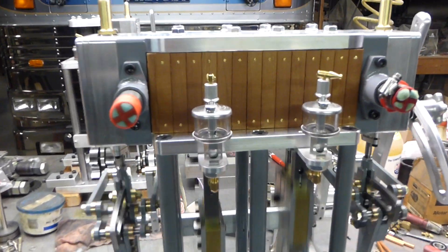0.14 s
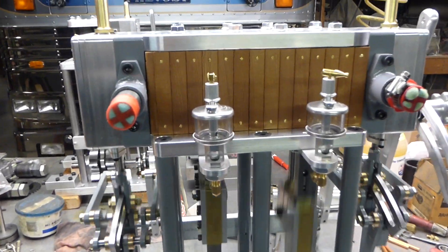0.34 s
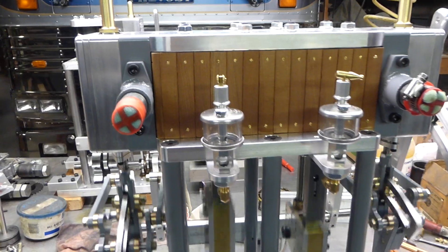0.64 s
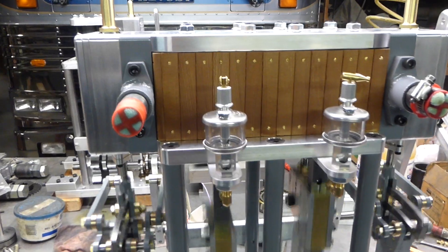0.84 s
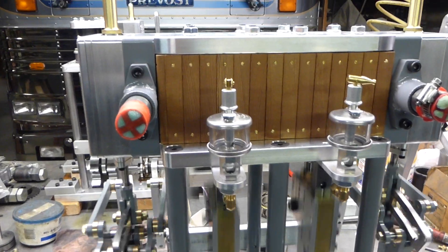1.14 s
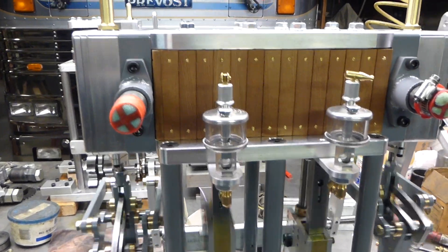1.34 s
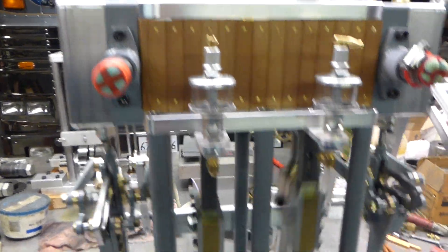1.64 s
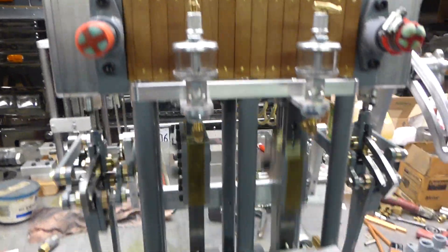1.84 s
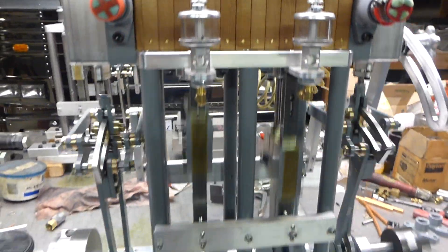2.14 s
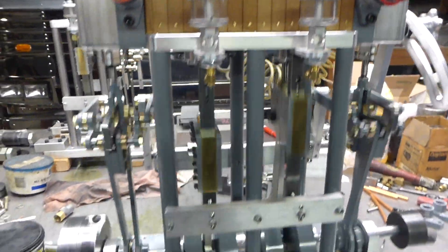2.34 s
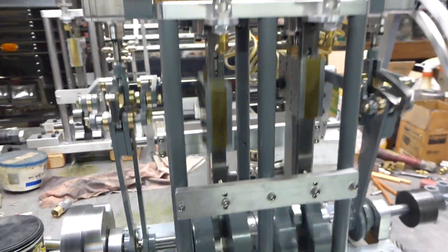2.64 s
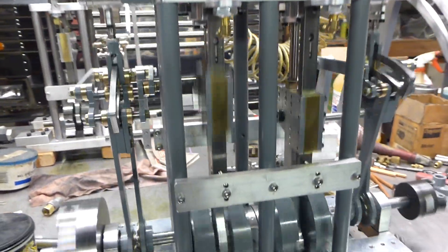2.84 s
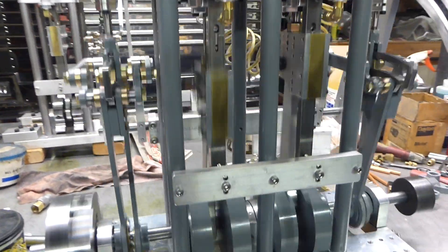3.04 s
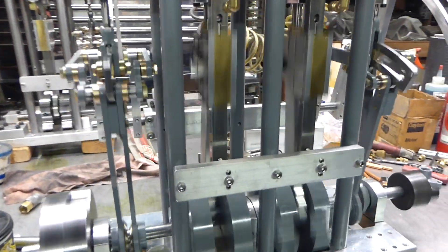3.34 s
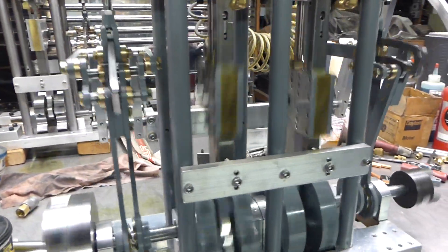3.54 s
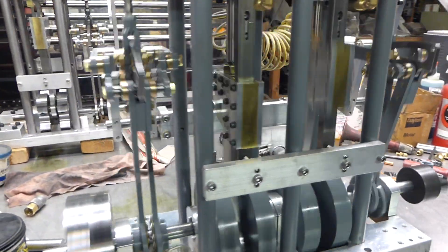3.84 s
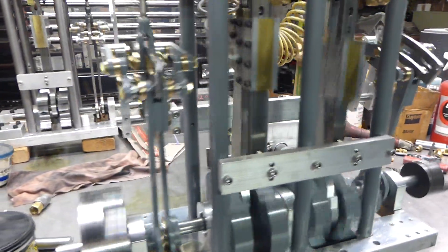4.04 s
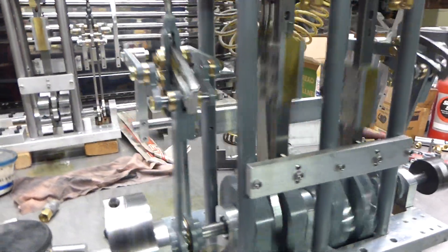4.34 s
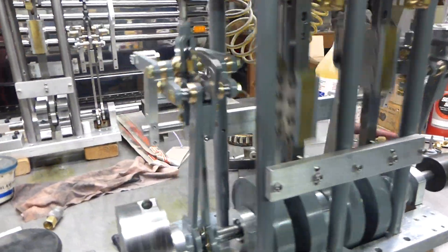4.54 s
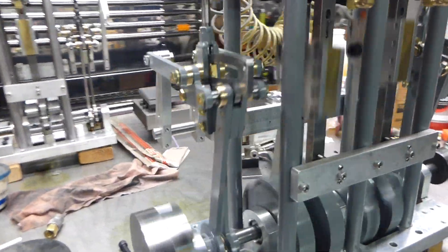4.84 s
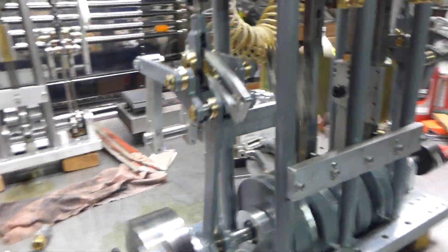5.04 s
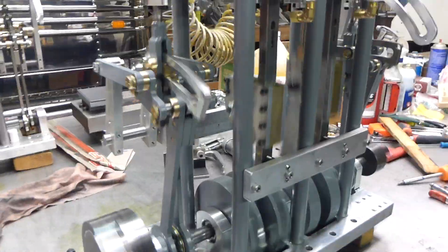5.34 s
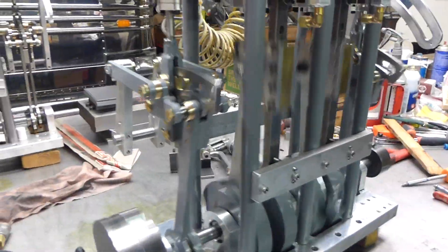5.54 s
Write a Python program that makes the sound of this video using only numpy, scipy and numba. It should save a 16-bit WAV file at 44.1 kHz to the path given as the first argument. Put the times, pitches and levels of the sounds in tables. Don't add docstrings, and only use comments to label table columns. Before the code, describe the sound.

From 0 to about 5.7 seconds a small two-cylinder engine runs continuously at arm's length, nearly three turns a second, slowing almost imperceptibly. Each turn gives four blunt, short exhaust pops, about eleven a second, the first strongest and alternate ones weaker, each with a small thump and quick rebound. Airy high hiss from glands and ports swells and shuts with the strokes, with narrower midrange puffs from pipe and valve chest. Once a turn, roughly every 0.37 seconds from 0.29, the valve gear gives a brief clattering rattle. Loose links clack irregularly, notably near 0.5, 1.2, 2.05, 4.1, and hardest at 5.2, with another near 5.65. A low frame rumble shudders beneath. Hiss and puffs come nearer around 3.5 to 4.3, then the top hiss recedes. A faint low stir of air passes near 2.75. Short, soft workshop reverberation; sound cuts off still running.

```python
import sys
import numpy as np
from scipy import signal
from scipy.fft import rfft, irfft
from scipy.io import wavfile
from scipy.ndimage import uniform_filter1d
from numba import njit

SR = 44100
rng = np.random.default_rng(int(sys.argv[2]) if len(sys.argv) > 2 else 0)


def int16_out(signal):
    q = np.round(np.clip(np.atleast_2d(signal).T, -1, 1) * 32767)
    wavfile.write(sys.argv[1], SR, q.astype(np.int16))


def gain_from_db(level_db):
    decades = np.asarray(level_db, float) / 20
    return 10 ** decades


N = 250488

# time in seconds, turns made.
CRANK_S_TURNS = [(-0.0282, 0), (1.4402, 4), (2.1758, 6), (4.0122, 11), (5.1159, 14), (5.4853, 15),
                 (5.856, 16)]
# time in seconds, gland, cylinders, exhaust pipe and frame levels in dB.
DRIFT_S_DB = [(0.0, -1.5, 1, 0.5, -1.5), (0.3, -0.5, 0.9, -.5, 0), (1.0, .2, 1.5, 0, -0.5),
              (1.6, 1, 1.6, 1.6, -1), (2.3, -1, 1, 1, -2), (3.1, .5, 1, 2.5, -1), (3.5, 2.5, 3, 4, 2),
              (3.8, 4.5, 1.5, 3, 0.5), (4.3, 3, 2.5, 2, 0), (4.47, -2.3, 0.9, 1.5, -0.5),
              (5.05, -1, 0.4, 1.5, 1.5), (5.68, -2.5, 0.5, 2.5, 0.5)]

# frequency in Hz, level in dB.
DRAUGHT_HZ_DB = [(20, -11), (60, -10.5), (110, 3), (200, -36)]
DRAUGHT_DB, SWELL_S, SWELL_SPREAD_S, SWELL_DB = -72, 2.75, .3, 6.4
SHOP_T60_S, SHOP_DB = .5, -21

# frequency in Hz, density in dB per Hz.
FRAME_HZ_DB = [(18, -65), (30, -43), (49, -66), (160, -7), (346, -2.5), (532, -5), (592, -2.5), (762, -8),
               (998, -4), (1650, -10.5), (2010, -11.5), (2200, -21), (2860, -13.5), (4840, -120)]
# crank angle in degrees, spread in degrees, rise in dB.
SHAKES_DEG_DB = [(14.7, 13.6, 4.5), (87, 0.6, 5), (114.3, 19.6, 6), (229, 22, 3.5), (328, 17.3, 4.5)]
RUMBLE_DB = -47

STROKES_DEG = [
    (2, 97.5),
    (175, 279),
]
PRESSURE_ROUNDNESS = .53
# time in seconds, centre in Hz.
JET_S_HZ = [(0.0, 13300), (1.28, 13200), (1.93, 12900), (2.72, 13250), (3.95, 13800), (4.37, 13800),
            (4.63, 13700), (5.01, 14100), (5.68, 14200)]
# frequency in Hz, level in dB.
PORTS_HZ_DB = [(4800, -17), (5800, 0), (6400, -3), (7300, 0.5), (8200, -2), (9800, 0.5), (11500, -1.5),
               (12800, 0.5)]
# centre in Hz, width in Hz, level in dB.
PIPE_HZ_DB = [(3780, 315, 2), (4670, 175, 1.5), (5350, 640, 0.5), (4200, 340, -9.5), (4160, 4160, -4)]
# centre in Hz, width in Hz, level in dB.
CHEST_HZ_DB = [(2260, 180, 2), (2420, 92, 1.5), (2620, 78, 0), (2878, 86, -2), (3307, 210, -3),
               (2850, 1200, -11.5)]
# crank angle in degrees, spread in degrees, rise in dB.
GLAND_PUFFS_DEG_DB = [(107.7, 5.1, 17.5), (291, 4.5, 7.5), (364, 7.4, 7), (320, 23, 3), (78, 9.2, 0.5)]
# crank angle in degrees, spread in degrees, rise in dB.
PORT_PUFFS_DEG_DB = [(11, 3.3, 2.5), (88, 5, 1.3), (104.5, 6.4, 7.7), (202, 3, 1.3), (269, 4.5, 3),
                     (330, 24, 1.1), (358, 6, 7.6)]
# crank angle in degrees, spread in degrees, rise in dB.
PIPE_PUFFS_DEG_DB = [(14.3, 8.9, 8.8), (91.5, 4.7, 8.2), (105.4, 5, 7.3), (122, 8.8, 5.6), (150, 10.5, 1.9),
                     (193, 3.1, 4.9), (231, 15, 2.9), (287, 1.4, 4.3), (322, 1.4, 1.1), (355, 5.1, 11.7)]
# crank angle in degrees, spread in degrees, rise in dB.
CHEST_PUFFS_DEG_DB = [(17, 8.6, 6.2), (29, 5.1, 8.4), (88, 8.1, 3.7), (107, 6.6, 6.6), (126.5, 5, 9.1),
                      (164, 25, 3.7), (223, 16.7, 4.8), (286, 2.9, 4.4), (319, 5.5, 2.5), (349, 8.5, 6.9)]
# crank angle in degrees, spread in degrees, change in dB.
HISS_DIPS_DEG_DB = [(4, 2.6, -6), (97.4, 3.3, -3.5), (282.7, 3.1, -4)]
PUFF_LEAN = .25
STROKE_DB = .5

# time in seconds, rod level in dB, pin level in dB, pin pitch in Hz.
CLACKS_S_DB_HZ = [(0.076, -25, -26, 2800), (0.0987, -31, -24, 2820), (0.1926, -28, -17.5, 2380),
                  (0.3541, -30, -35, 2610), (0.4578, -20, -17, 2500), (0.5466, -25, -14.5, 1900),
                  (0.9442, -33, -19, 2720), (1.1819, -19.5, -30, 2700), (1.1854, -30, -17, 2650),
                  (1.198, -30, -19, 2900), (1.2933, -26, -23, 2500), (1.5682, -48, -26, 3220),
                  (1.9351, -26, -25, 2720), (2.0531, -30.5, -12, 2440), (2.191, -28, -42, 2772),
                  (2.3018, -27, -20, 2530), (3.158, -30, -25, 2800), (3.3819, -22, -23, 2520),
                  (3.5038, -37, -23, 2600), (3.6413, -44, -24.5, 3900), (3.7722, -43, -19.5, 3300),
                  (4.1316, -19, -22, 2340), (4.2405, -26, -26, 2840), (4.2466, -28, -20, 2720),
                  (4.4094, -44, -22.5, 2620), (4.4833, -22, -24, 2250), (5.187, -25, -22, 2440),
                  (5.2115, -13.5, -11, 2380), (5.6384, -29, -18, 2480), (5.651, -15.5, -25, 2610)]
# crank angle in degrees, rod level in dB, pin level in dB, pin pitch in Hz.
TICKS_DEG_DB_HZ = [(14.93, -32, -37, 3400), (28.9, -46, -36.5, 2800), (130.8, -39.5, -25.5, 2950),
                   (351, -52, -62, 2850), (357.7, -35, -28.5, 5000), (11.82, -42, -35, 5800),
                   (107.7, -39, -32, 7300)]
# time in seconds, level in dB, pitch in Hz, decay time T60 in seconds.
KNOCKS_S_DB_HZ_S = [(0.5468, -27, 1340, 0.0043), (3.406, -37, 1000, 0.0089), (5.188, -22, 610, 0.014),
                    (5.243, -31, 1030, 0.016), (5.27, -28, 806, 0.011), (5.5993, -26, 990, 0.016),
                    (5.62, -39, 800, 0.011), (5.6533, -33, 1010, .012)]
TICK_SPREAD_DEG, TICK_SPREAD_DB = 1.964, -0.5
ROD_HZ, LINK_T60_S = 980, .0099
CHOKE_DB_PER_DB = .36

# time in seconds, peak in dB, pitch in Hz, brightness in dB.
RATTLES_S_DB_HZ = [(0.29, -20.5, 830, -18), (0.659, -15.5, 830, -18), (1.025, -20, 850, -21),
                   (1.392, -20, 820, -38), (1.758, -21.5, 860, -30), (2.128, -16.5, 910, -19.5),
                   (2.496, -19.5, 1090, -19), (2.863, -20.5, 1110, -15), (3.229, -24, 1040, -26),
                   (3.6, -23.5, 1210, -16), (3.965, -18.5, 1180, -15.5), (4.333, -19.5, 1180, -9.5),
                   (4.7, -28, 1770, -3), (5.068, -21, 930, -17), (5.437, -19.5, 1000, -18)]

# time in seconds, strong pair in dB, weak pair in dB.
LOAD_S_DB = [(0, 0, 0), (1, 1, 2), (2, 0.5, 1), (3, 0, 0.5), (4, 2, -1), (5, 2, -2), (5.68, -0.5, -3)]
# crank angle in degrees, signed peak, pitch in Hz, length in ms, weak pair 0-1.
SLUGS_DEG_HZ_MS = [
    (0, .096, 490, 1.05, 0),
    (4.15, -.064, 540, .9, 0),
    (93.5, .048, 490, 1.05, 1),
    (97.9, -.027, 540, .9, 1),
    (193.2, .068, 490, 1.05, 0),
    (197.05, -.016, 540, .9, 0),
    (277.75, .043, 490, 1.0, 1),
    (281.4, -.056, 680, .75, 1),
    (241.4, -.012, 360, 5.5, 0),
    (329, -.012, 360, 4.5, 0),
]

# start in seconds, end in seconds, side over mid in dB.
APART_S_DB = [(0.0, 0.032, -15), (0.04, 0.117, -12), (0.258, 0.566, -16.5), (0.66, 0.707, -15),
              (0.829, 1.057, -16), (1.194, 1.334, -18), (1.367, 1.418, -12.5), (1.7, 2.022, -17.5),
              (2.063, 2.19, -18.5), (2.272, 2.53, -18), (2.561, 2.655, -20), (2.727, 2.859, -16),
              (2.98, 3.25, -16), (3.293, 3.302, -16), (3.39, 3.514, -16.5), (3.651, 3.743, -14),
              (4.046, 4.145, -20), (4.203, 4.28, -15), (4.303, 4.412, -17), (4.453, 4.568, -15),
              (4.712, 4.827, -15.5), (4.846, 4.856, -12), (5.006, 5.265, -19), (5.41, 5.558, -18.5),
              (5.592, 5.733, -14)]
# frequency in Hz, level in dB.
APART_HZ_DB = [(30, 1), (120, 3), (300, -3.5), (1000, 0), (5000, 2), (9000, 3), (13000, 0)]
APART_PATCHY_DB = 3


def level(x):
    return x / np.sqrt(np.mean(x ** 2))


def curve(table):
    s, *columns = np.transpose(table)
    return [np.interp(np.arange(N) / SR, s, c) for c in columns]


def marks():
    s, turns = np.transpose(CRANK_S_TURNS)
    return np.interp(np.arange(turns[-1] + 1), turns, s)


def swells(deg, table, lean=0.):
    out = 0
    for at, spread, db in table:
        late = (deg - at + lean * spread + 180) % 360 - 180
        width = spread * (1 + lean * np.sign(late))
        out = out + db * np.exp(-.5 * (late / width) ** 2)
    return out


def add(out, s, sound):
    i = int(round(s * SR))
    a, b = max(i, 0), min(i + len(sound), N)
    if a < b:
        out[a:b] += sound[a - i:b - i]


def walk(rate_hz):
    k = int(SR / rate_hz)
    return level(uniform_filter1d(np.repeat(rng.standard_normal(N // k + 1), k), k)[:N])


def coloured(points):
    f = np.fft.rfftfreq(N, 1 / SR) + 1
    hz, db = np.transpose(points)
    gain = gain_from_db(np.interp(np.log(f), np.log(hz), db, left=-99, right=-99))
    return level(irfft(rfft(rng.standard_normal(N)) * gain, N))


@njit
def svf(x, hz, width):
    y, b, l = np.empty(len(x)), 0., 0.
    for i in range(len(x)):
        g, k = np.tan(np.pi * hz[i] / SR), width / hz[i]
        v = (b + g * (x[i] - l)) / (1 + g * (g + k))
        b, l, y[i] = 2 * v - b, l + 2 * g * v, k * v
    return y


def humps(modes):
    out = 0
    for hz, width, db in modes:
        drive = gain_from_db(db + 2.4 * np.clip(walk(35.), -2.5, 1.6)) * rng.standard_normal(N)
        centre = np.full(N, 1. * hz)
        out = out + svf(svf(drive, centre, 1.55 * width), centre, 1.55 * width)
    return level(out)


def ring(hz, t60, t):
    return -np.sin(2 * np.pi * hz * t) * (1 - np.exp(-t / .00036)) * np.exp(-np.log(1000) * t / t60)


def draught():
    swell = np.exp(-.5 * ((np.arange(N) / SR - SWELL_S) / SWELL_SPREAD_S) ** 2)
    return gain_from_db(DRAUGHT_DB + SWELL_DB * swell + 2.1 * walk(8.3)) * coloured(DRAUGHT_HZ_DB)


def shop(x):
    t = np.arange(int(SHOP_T60_S * SR)) / SR
    cloud = rng.standard_normal(len(t)) * np.exp(-np.log(1000) * t / SHOP_T60_S) * (t > .003)
    return gain_from_db(SHOP_DB) * signal.fftconvolve(x, cloud / np.sqrt(np.sum(cloud ** 2)))[:N]


def frame(deg):
    swell_db = swells(deg, SHAKES_DEG_DB)
    uneven_db = .12 * swell_db * walk(11.) + 1.8 * walk(130.)
    near_db = curve(DRIFT_S_DB)[3]
    return gain_from_db(RUMBLE_DB + near_db + swell_db + uneven_db) * coloured(FRAME_HZ_DB)


def gland_jet():
    jet_hz, = curve(JET_S_HZ)
    return level(svf(svf(rng.standard_normal(N), jet_hz, 5900.), 1.046 * jet_hz, 5700.))


def hiss(deg):
    pressure = 0
    for opens, shuts in STROKES_DEG:
        stroke = np.clip((deg - opens) % 360 / (shuts - opens), 0, 1)
        pressure = pressure + np.sin(np.pi * stroke).clip(0) ** PRESSURE_ROUNDNESS
    gland_db, block_db, pipe_db, _ = curve(DRIFT_S_DB)
    port_db = block_db + STROKE_DB * walk(6.3)
    pipe_db = pipe_db + STROKE_DB * walk(8.6)
    chest_db = block_db + STROKE_DB * walk(8.)
    # noise, level with valves shut dB, rise under pressure dB, puffs, nearness dB, flutter dB
    escapes = [(gland_jet(), -50, 14.5, GLAND_PUFFS_DEG_DB, gland_db, 1. * walk(150.)),
               (coloured(PORTS_HZ_DB), -49, 7, PORT_PUFFS_DEG_DB, port_db, 1.5 * walk(90.)),
               (humps(PIPE_HZ_DB), -49, 3, PIPE_PUFFS_DEG_DB, pipe_db, .9 * walk(120.)),
               (humps(CHEST_HZ_DB), -50, -.36, CHEST_PUFFS_DEG_DB, chest_db, 1.1 * walk(120.))]
    shared_db = swells(deg, HISS_DIPS_DEG_DB) + .7 * walk(25.)
    out = np.zeros(N)
    for noise, shut_db, rise_db, puffs, near_db, flutter_db in escapes:
        valve_db = shut_db + rise_db * pressure + swells(deg, puffs, PUFF_LEAN)
        out += gain_from_db(valve_db + shared_db + near_db + flutter_db) * noise
    return out


def clacks():
    out, t, turns = np.zeros(N), np.arange(2500) / SR, marks()
    lead_s = .0006
    for s, db, hz, t60 in KNOCKS_S_DB_HZ_S:
        add(out, s - lead_s, gain_from_db(db + 3.5) * ring(hz, t60, t))
    blows = list(CLACKS_S_DB_HZ)
    for start, end in zip(turns, turns[1:]):
        for deg, rod_db, pin_db, hz in TICKS_DEG_DB_HZ:
            a, b, c = rng.standard_normal(3)
            s = start + (end - start) * (deg + TICK_SPREAD_DEG * a) / 360
            blows.append((s, rod_db + TICK_SPREAD_DB * b, pin_db + TICK_SPREAD_DB * b, hz * (1 + .034 * c)))
    for s, rod_db, pin_db, pin_hz in blows:
        t60 = min(LINK_T60_S * gain_from_db(-CHOKE_DB_PER_DB * (rod_db + 26.5)), .024)
        rod = ring(ROD_HZ, .9 * t60, t)
        pin = .7 * ring(pin_hz, t60, t) + .5 * ring(1.24 * pin_hz, .55 * t60, t)
        snap = ring(1650, .004, t)
        blow = gain_from_db(rod_db + 3.5) * rod + gain_from_db(pin_db + 1.5) * pin
        add(out, s - lead_s, blow + gain_from_db((rod_db + pin_db) / 2 + 1.5) * snap)
    return out


def rattles():
    out, t = np.zeros(N), np.arange(800) / SR
    for s, db, hz, bright_db in RATTLES_S_DB_HZ:
        gaps, sizes, places = rng.random((3, 8))
        sizes[0] = 1
        lags_s = .00016 + .0023 * (np.cumsum(gaps) - gaps[0])
        for lag, size, place in zip(lags_s, sizes, places):
            low = ring(hz * (.91 + .24 * place), .0074, t)
            high = gain_from_db(bright_db + 7.5) * ring(1300 + 1500 * place, .02, t)
            add(out, s + lag, gain_from_db(db - 2 - 380 * lag) * (.32 + .58 * size) * (low + high))
        add(out, s + .00025, gain_from_db(db) * ring(1650, .0019, t))
    return out


def exhaust():
    out, half, turns = np.zeros(N), 1024, marks()
    t = np.arange(-half, half) / SR
    when, strong_db, weak_db = np.transpose(LOAD_S_DB)
    thump = .12 * np.exp(-.5 * ((t - .001) / .0026) ** 2) * np.cos(2 * np.pi * 185 * (t - .001))
    for start, end in zip(turns, turns[1:]):
        for deg, peak, hz, ms, weak in SLUGS_DEG_HZ_MS:
            db_chance, hz_chance = rng.standard_normal(2)
            s = start + (end - start) * deg / 360
            db = np.interp(s, when, strong_db + weak * (weak_db - strong_db)) + min(ms, 1.5) * db_chance
            shape = np.exp(-.5 * (1e3 * t / (ms * np.where(t < 0, .8, 1.2))) ** 2)
            cycles = hz * (1 + .015 * hz_chance) * t * np.where(t < 0, 1, .85)
            slug = peak * shape * np.cos(2 * np.pi * cycles)
            add(out, s - half / SR, gain_from_db(db) * (slug + max(peak, 0) * thump))
    return out


def scene():
    deg = 360 * curve(CRANK_S_TURNS)[0] % 360
    hits = exhaust() + rattles() + clacks()
    hits = signal.sosfiltfilt(signal.butter(2, 85, "high", fs=SR, output="sos"), hits)
    mid = draught() + shop(hits) + frame(deg) + hiss(deg) + hits
    return np.array([mid, mid])


def parting(mid):
    gate, block = np.zeros(N), 1024
    for start, end, db in APART_S_DB:
        gate[int(start * SR) + block // 2:int(end * SR) - block // 2] = gain_from_db(db - 1)
    hz, _, blocks = signal.stft(mid, fs=SR, nperseg=2 * block)
    patches = rng.standard_normal((len(hz) // 24 + 1, blocks.shape[1]))
    patches = np.repeat(patches, 24, axis=0)[:len(hz)]
    tone_hz, tone_db = np.transpose(APART_HZ_DB)
    tone = np.interp(np.log(hz + 1), np.log(tone_hz), tone_db)[:, None]
    phases = np.exp(2j * np.pi * rng.random(blocks.shape))
    grain = signal.istft(gain_from_db(tone + APART_PATCHY_DB * patches) * blocks * phases)[1][:N]
    return uniform_filter1d(gate, block) * grain * np.sqrt(np.mean(mid ** 2) / np.mean(grain ** 2))


def low_pass(x):
    return signal.sosfilt(signal.butter(12, 16100, fs=SR, output="sos"), x)


def record(dry):
    rounded = .3 * np.tanh(dry[0] / .3)
    mid = signal.sosfilt(signal.ellip(12, .3, 70, 15680, fs=SR, output="sos"), rounded)
    side = parting(mid)
    return low_pass(np.array([mid + side, mid - side]))


dry = scene()
out = record(dry)
int16_out(out)
```